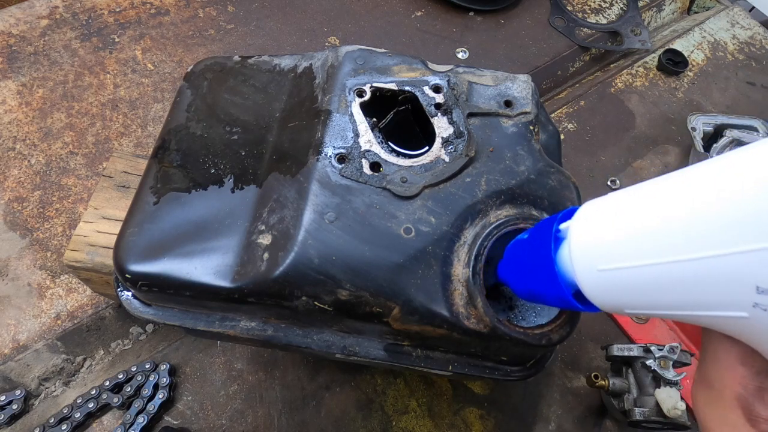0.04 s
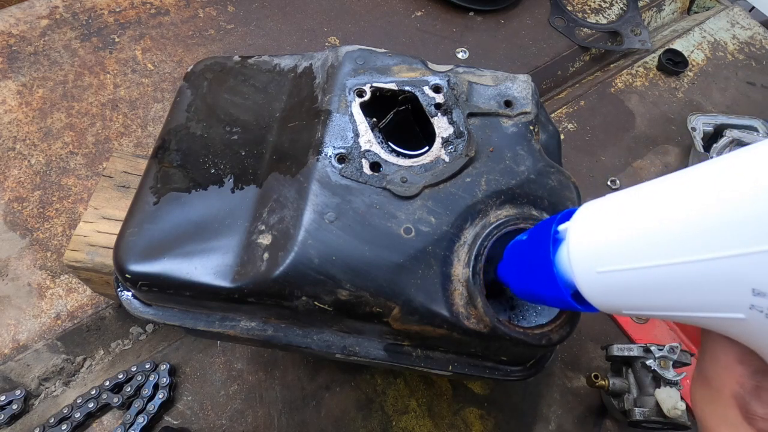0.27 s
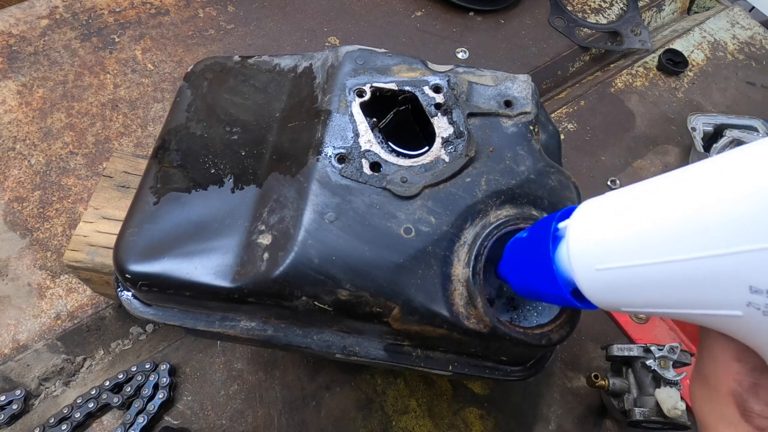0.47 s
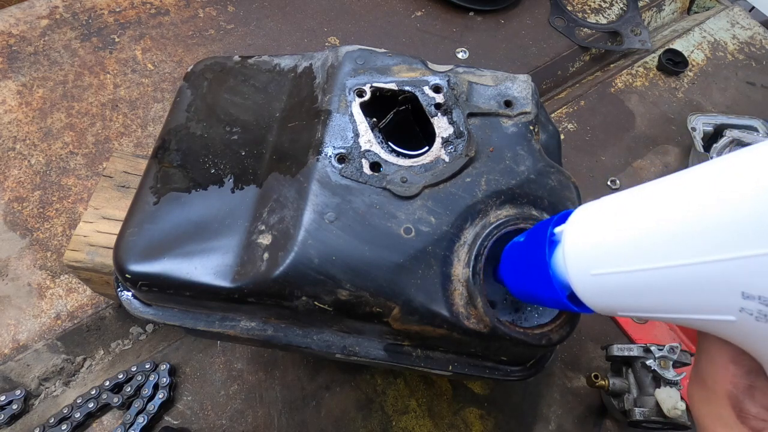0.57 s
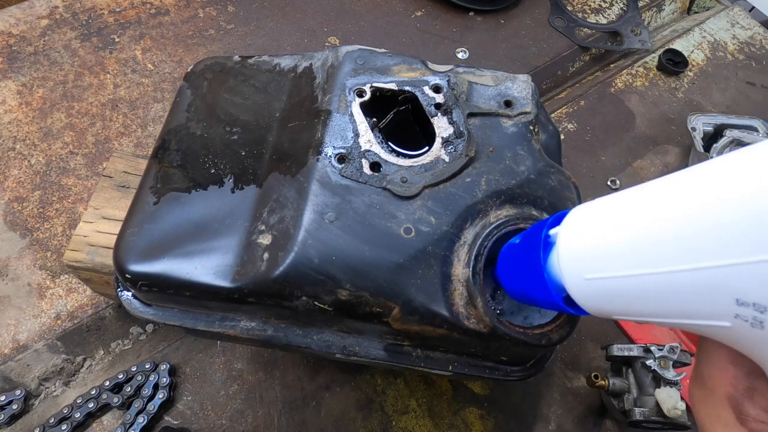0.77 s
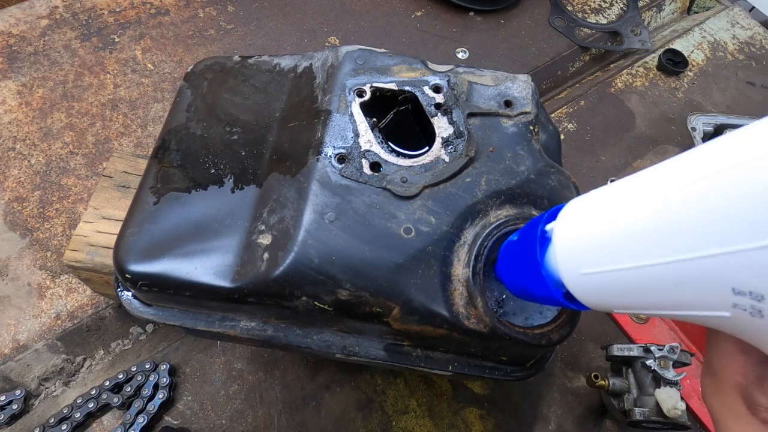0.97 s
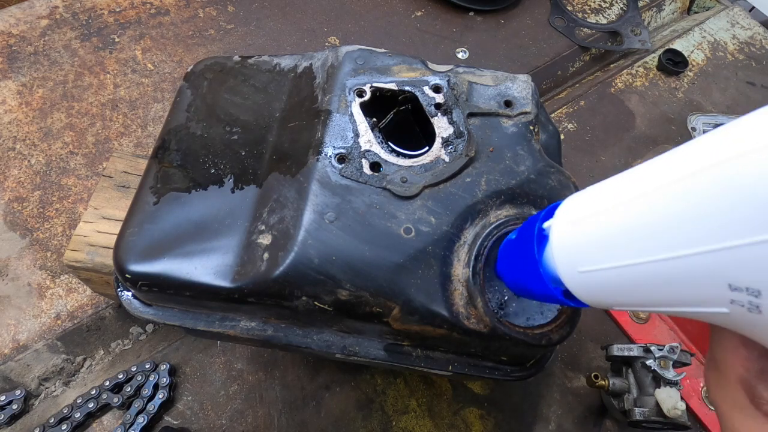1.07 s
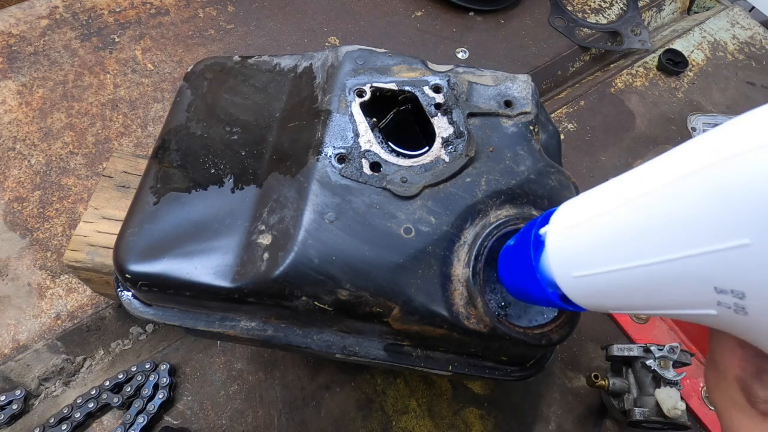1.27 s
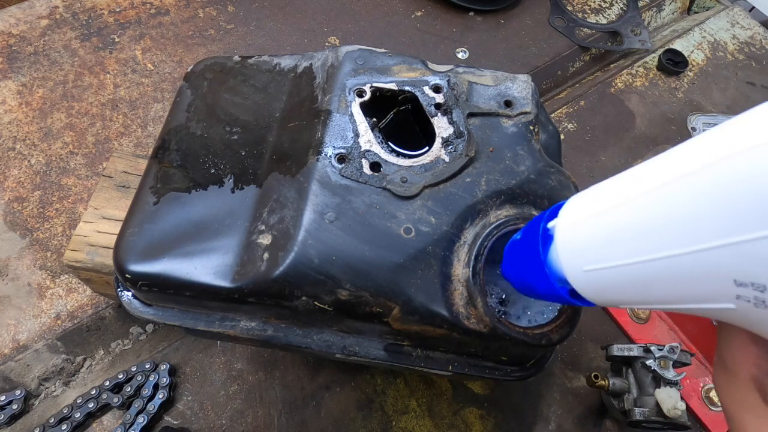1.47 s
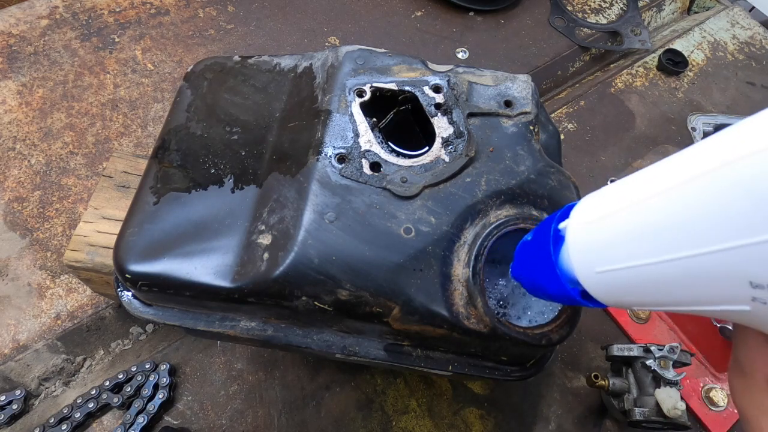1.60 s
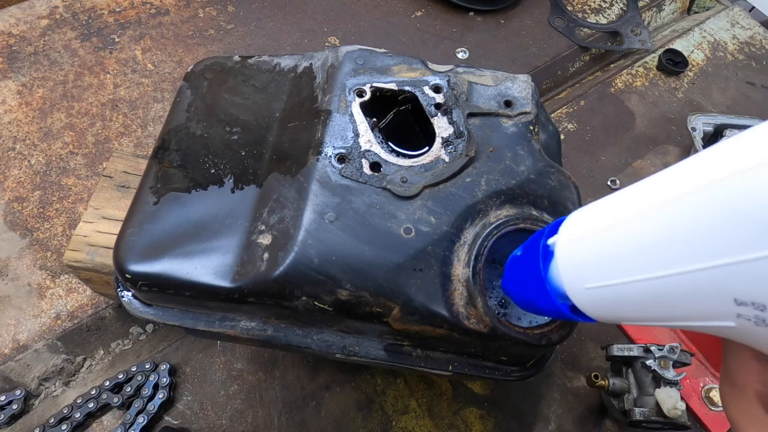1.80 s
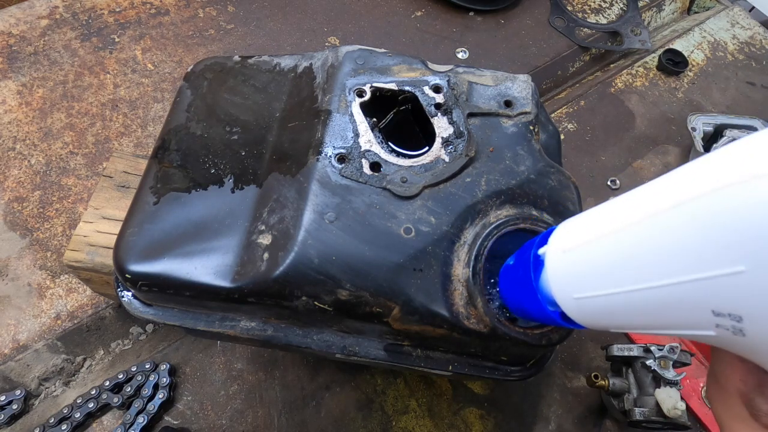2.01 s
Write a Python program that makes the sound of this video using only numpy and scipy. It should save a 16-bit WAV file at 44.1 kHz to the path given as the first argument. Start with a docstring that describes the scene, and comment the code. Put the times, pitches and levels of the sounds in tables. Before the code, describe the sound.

In a quiet workshop, a close jet of liquid fizzes from a bottle and drums inside a hollow metal tank in three short squirts. A brief plastic scrape and several dull knocks follow as the tank rocks slightly.

```python
"""A nozzle spits and fizzes as a jet of liquid cleaner drums on the wall of an empty steel tank.
The jet comes from a plastic bottle in three squirts; between the last two, the bottle draws air
with a faint hollow tone. Then the nozzle scrapes in the tank's filler neck and knocks against
the tank, which rocks a little. A quiet workshop hums in the background."""
import sys
import numpy as np
from scipy import signal
from scipy.fft import rfft, irfft
from scipy.io import wavfile

SR = 44100
rng = np.random.default_rng(int(sys.argv[2]) if len(sys.argv) > 2 else 0)


def generate_wav(signal):
    """Clip the signal to [-1, 1] and save it as 16-bit WAV at the path in sys.argv[1]."""
    frames = np.transpose(np.atleast_2d(signal))
    scaled = np.clip(frames, -1, 1) * 32767
    pcm = np.round(scaled).astype(np.int16)
    wavfile.write(sys.argv[1], SR, pcm)


N = 90404
T = np.arange(N) / SR

# how hard the jet pushes, one list per squirt: t/s, level/dB
JET_FORCE = [
    [(.17, -80), (.204, -48.5), (.24, -45.5), (.29, -35), (.335, -35), (.41, -37), (.5, -42), (.55, -50.5),
     (.58, -69), (.62, -83)],
    [(.61, -56), (.645, -60), (.665, -48.5), (.705, -46.5), (.74, -42.5), (.81, -44.5), (.875, -56),
     (.9, -45), (.925, -54), (.97, -53.5), (1.06, -69)],
    [(1.125, -59.5), (1.165, -50.5), (1.21, -45.5), (1.27, -42.5), (1.33, -48), (1.385, -50), (1.425, -55),
     (1.45, -72), (1.49, -75)],
]
# blobs of liquid that hit the wall on their own: t/s, level/dB
BLOBS = [(.2495, -25), (.254, -31.5), (.544, -38), (.652, -35.5), (.679, -36), (.886, -45.5), (.897, -50),
         (.907, -49), (1.149, -41.5), (1.173, -38.5), (1.204, -33.5), (1.247, -33.5), (1.362, -43),
         (1.412, -41)]
# tone colour of the splash: f/Hz, level/dB
SPLASH_COLOUR = [(1200, -3.5), (2700, -1), (3200, 3.5), (4200, 1), (6000, -5), (7200, -5), (9500, -13.5),
                 (16000, -15)]
# the broad notes at which the tank rings: f/Hz, width/Hz, level/dB
TANK_NOTES = [(153, 8.4, -4), (296.7, 42, -0.5), (403, 16.7, -4), (479.7, 25, -5), (708.6, 33, 1),
              (799, 100, -0.5), (930, 76, 2), (1049, 65, -6), (1360, 107, -4), (1577, 136, -3.5),
              (1804, 105, -3), (2008, 96, -6), (2285, 165, -1), (2468, 137, -3), (2636, 95, -8)]
# fine spray fizzing at the nozzle: t/s, level/dB
FIZZ_LEVEL = [(0, -82), (.08, -70), (.19, -72), (.24, -60), (.29, -46), (.335, -46.5), (.38, -53.5),
              (.48, -65.5), (.58, -80.5), (.7, -76), (.77, -68.5), (.9, -82), (1.14, -83), (1.21, -67),
              (1.3, -68), (1.36, -82), (1.5, -86)]
# its tone colour: f/Hz, level/dB
FIZZ_COLOUR = [(5000, -11), (9000, -16), (10200, -9), (10900, -3), (12000, -4.5), (13500, -4),
               (16000, -11.5)]
# air spat out ahead of the liquid: t/s, level/dB
SPIT_LEVEL = [(.165, -74), (.195, -53), (.205, -41), (.235, -48.5), (.3, -46.5), (.36, -53.5), (.45, -59.5),
              (.56, -81)]
# its tone colour: f/Hz, level/dB
SPIT_COLOUR = [(400, -5), (850, 17.5), (1400, 1), (2900, -6), (4100, 6.5), (4700, 2), (5300, 2.5),
               (6100, -5), (7500, -3), (9500, -9), (16000, -30)]
# the bottle's clicks and knocks: t/s, thump level/dB, ring level/dB, tick level/dB, treble limit/Hz
KNOCKS = [(1.019, -76, -47, -42.5, 9200), (1.081, -60, -47.5, -43.5, 6950), (1.086, -72, -55, -42.5, 7000),
          (1.521, -62, -45, -48, 4000), (1.5373, -54, -38, -32.5, 8500), (1.54, -38, -48, -37, 5900),
          (1.588, -35.5, -49, -50, 7000), (1.6279, -25.5, -33.5, -29.5, 15000),
          (1.6395, -34, -63, -35.5, 5500), (1.755, -34.5, -49, -40, 3400), (1.866, -51, -78, -70, 790),
          (1.891, -46.5, -62, -57, 1500), (1.904, -51, -77, -67, 825), (1.948, -46.5, -65, -49.5, 4950),
          (1.966, -73, -56, -54, 2200), (2.046, -60, -46, -51.5, 2950)]
# the notes in the tank's thump: f/Hz, level/dB, time to fade by 60 dB/s
THUMP_NOTES = [(255, -27, 0.041), (285.8, 6, 0.074), (304.5, -3, 0.18), (404, -0.5, 0.043),
               (483, -0.5, 0.082), (575, -22, 0.046), (713, -12, 0.081), (846, -36, 0.069)]
# tone colour of the plastic tick: f/Hz, level/dB
TICK_COLOUR = [(110, -24), (300, 4.5), (700, 3.5), (2400, -0.5), (3200, -8.5), (5400, -8), (7500, -17.5),
               (9000, -19), (11500, -8.5), (16000, -16)]
# the nozzle rubbing in the neck: t/s, level/dB
SCRAPE_LEVEL = [(1.49, -64.5), (1.53, -56), (1.555, -46.5), (1.59, -45.5), (1.612, -49.5), (1.626, -41),
                (1.645, -49.5), (1.72, -83)]
# its tone colour: f/Hz, level/dB
SCRAPE_COLOUR = [(100, -49), (290, 10.5), (450, 4), (850, 2.5), (1200, -7), (2400, -8), (3000, -19),
                 (6000, -20.5), (16000, -26)]
# air drawn back through the nozzle: t/s, f/Hz, level/dB
INTAKE_TONE = [(.88, 410, -61), (0.951, 439, -66), (1.0, 428.2, -61.5), (1.034, 480, -57),
               (1.065, 496, -66), (1.095, 481.5, -56), (1.125, 446, -60), (1.17, 426, -56)]
# tone colour of its hiss: f/Hz, level/dB
HISS_COLOUR = [(1500, -27), (3500, -3), (5000, -5), (7500, -3), (9500, -12), (12000, -30)]
# tone colour of the room noise: f/Hz, level/dB
ROOM_COLOUR = [(20, -5), (44, -1), (60, -6.5), (100, -6), (300, -10.5), (600, -11.5), (1200, -18),
               (2400, -18), (3200, -24), (8000, -24.5), (16000, -30.5)]

BASS_CUT_HZ = 188  # thump and scrape are weakened below this


def jet(reference_db=-40.5):
    """The jet breaks into drops that drum on the wall and splash; single blobs slap against it."""
    force_db = np.max([level(squirt) for squirt in JET_FORCE], axis=0)
    force = from_db(force_db)
    drops = clicks(per_s=3500, spread_db=1.5)
    # As the jet grows, the low notes swell less than it does and the high notes swell more.
    extra_db = force_db - reference_db
    boom = from_db(1 - 0.44 * extra_db)
    bright = from_db(0.54 * extra_db)
    drumming = from_db(-1) * tank(drops * force, boom, bright) / np.std(tank(drops))
    splash = from_db(-22) * force * rms_one(colour(drops, SPLASH_COLOUR))
    out = drumming + splash
    slap = peak_one(tank(signal.unit_impulse(N)))
    for start_s, db in BLOBS:
        add(out, start_s, from_db(db) * slap)
    return out


def tank(push, boom=1, bright=1):
    """The tank rings, heard through its openings; boom scales its low notes, bright its high ones."""
    out = np.zeros(N)
    for k, (hz, width_hz, db) in enumerate(TANK_NOTES):
        gain = boom if hz < 600 else bright if hz > 1200 else 1
        out += (-1) ** k * from_db(db) * resonate(push * gain, hz, width_hz)
    return keep_side(keep_side(out, 227, "high", order=4), 2620, "low", order=6)


def nozzle():
    """Air and foam spit from the nozzle and fizz in quick bursts."""
    fizz_clicks = clicks(per_s=4000, spread_db=2.5) * flutter(depth_db=3.5, hz=170)
    spit_clicks = clicks(per_s=12000, spread_db=2) * flutter(depth_db=1.8, hz=70)
    fizz = rms_one(colour(fizz_clicks, FIZZ_COLOUR)) * from_db(level(FIZZ_LEVEL) + 4)
    spit = rms_one(colour(spit_clicks, SPIT_COLOUR)) * from_db(level(SPIT_LEVEL))
    return fizz + spit


def knocks():
    """Bottle meets tank: each knock is a plastic tick, a short ring of the wall and a low thump."""
    notes = sum(from_db(db) * fade(fade_s) * np.sin(2 * np.pi * hz * T)
                for hz, db, fade_s in THUMP_NOTES)
    thump = peak_one(keep_side(notes, BASS_CUT_HZ, "high", order=3))
    out = np.zeros(N)
    for start_s, thump_db, ring_db, tick_db, treble_hz in KNOCKS:
        plastic = colour(rng.standard_normal(N) * fade(seconds=0.021), TICK_COLOUR)
        steel = tank(rng.standard_normal(N) * fade(seconds=0.018))
        tick = from_db(tick_db) * peak_one(keep_side(plastic, treble_hz, "low"))
        ring = from_db(ring_db) * peak_one(keep_side(steel, treble_hz, "low"))
        add(out, start_s, tick + ring + from_db(thump_db) * thump)
    return out


def scrape():
    """Plastic slips over the rim in many tiny catches."""
    catches = clicks(per_s=2000, spread_db=2.5) * flutter(depth_db=2.5, hz=68)
    rubbing = keep_side(colour(catches, SCRAPE_COLOUR), BASS_CUT_HZ, "high")
    return rms_one(rubbing) * from_db(level(SCRAPE_LEVEL))


def intake(roughness_hz=41):
    """The bottle draws air back in, with a rough hollow tone that rises and falls, and a thin hiss."""
    times, hz, db = np.transpose(INTAKE_TONE)
    phase = 2 * np.pi * np.cumsum(np.interp(T, times, hz)) / SR
    tone = drift(roughness_hz) * np.cos(phase) + drift(roughness_hz) * np.sin(phase)
    hiss = from_db(-12) * rms_one(colour(rng.standard_normal(N), HISS_COLOUR))
    return (rms_one(tone) + hiss) * from_db(level(np.c_[times, db]))


def echo(sound, delay_s=0.004):
    """Sound bounces around the tank and the workshop, leaving a short, dull tail."""
    tail = keep_side(rng.standard_normal(N), 5250, "low") * fade(seconds=0.35) * (T > delay_s)
    return from_db(-19.5) * signal.fftconvolve(sound, tail / np.linalg.norm(tail))[:N]


def workshop(hum_hz=43):
    """Quiet room noise with a low, slightly wavering hum."""
    phase = 2 * np.pi * hum_hz * T
    hum = rms_one(np.sin(phase) + from_db(-6) * np.sin(2 * phase)) * flutter(depth_db=1.5, hz=6)
    noise = rms_one(colour(rng.standard_normal(N), ROOM_COLOUR))
    return from_db(-65) * noise + from_db(-69) * hum


def from_db(db):
    """Turn decibels into a number to multiply by."""
    return 10 ** (np.asarray(db) / 20)


def rms_one(x):
    """Scale to an average strength (rms) of 1."""
    return x / np.sqrt(np.mean(x ** 2) + 1e-20)


def peak_one(x):
    """Scale so the biggest swing is 1."""
    return x / np.abs(x).max()


def level(rows):
    """Join points in time into a dB curve, silent before and after them."""
    return np.interp(T, *np.transpose(rows), left=-140, right=-140)


def fade(seconds):
    """A fade that falls by 60 dB in the given time."""
    return from_db(np.maximum(-60 * T / seconds, -200))


def drift(hz):
    """A smooth random wobble of typical size 1; more hz makes it quicker."""
    r = np.exp(-2 * np.pi * hz / SR)
    return rms_one(signal.lfilter([1], [1, -2 * r, r * r], rng.standard_normal(2 * N))[N:])


def flutter(depth_db, hz):
    """A random wobble in loudness."""
    return from_db(depth_db * drift(hz))


def clicks(per_s, spread_db):
    """Random clicks of uneven size."""
    sizes = from_db(spread_db * np.minimum(rng.exponential(1, N), 4))
    signs = rng.choice([-1, 1], N)
    return rms_one(sizes * signs * (rng.random(N) < per_s / SR))


def keep_side(x, hz, side, order=2):
    """Keep the "low" or "high" side of hz; a higher order cuts more sharply."""
    return signal.sosfilt(signal.butter(order, hz, side, fs=SR, output="sos"), x)


def colour(x, points):
    """Make each frequency louder or softer, following a tone colour table."""
    hz, db = np.transpose(points)
    shape_db = np.interp(np.log(np.fft.rfftfreq(2 * N, 1 / SR) + 1), np.log(hz), db)
    # These steps (a minimum-phase filter) put the ringing after each click, never before it.
    cepstrum = irfft(np.log(from_db(shape_db)))[:N]
    cepstrum[1:] *= 2
    return irfft(rfft(x, 2 * N) * np.exp(rfft(cepstrum, 2 * N)))[:N]


def resonate(x, hz, width_hz):
    """Ring at one note; a smaller width rings longer."""
    r = np.exp(-np.pi * width_hz / SR)
    feedback = [1, -2 * r * np.cos(2 * np.pi * hz / SR), r * r]
    return signal.lfilter(np.array([1, 0, -1]) * (1 - r * r) / 2, feedback, x + 1e-18)


def add(out, start_s, sound):
    """Mix a sound in at the given time."""
    start = int(start_s * SR)
    out[start:] += sound[:N - start]


def scene():
    """Squirts, then scraping and knocks, over the quiet room, in one channel."""
    work = jet() + nozzle() + intake() + scrape() + knocks()
    return (work + echo(work) + workshop())[None]


def record(dry, cutoff_hz=15850):
    """Cut away the very highest treble sharply."""
    return signal.sosfilt(signal.ellip(12, .1, 70, cutoff_hz, fs=SR, output="sos"), dry)


dry = scene()
out = record(dry)
generate_wav(out)
```